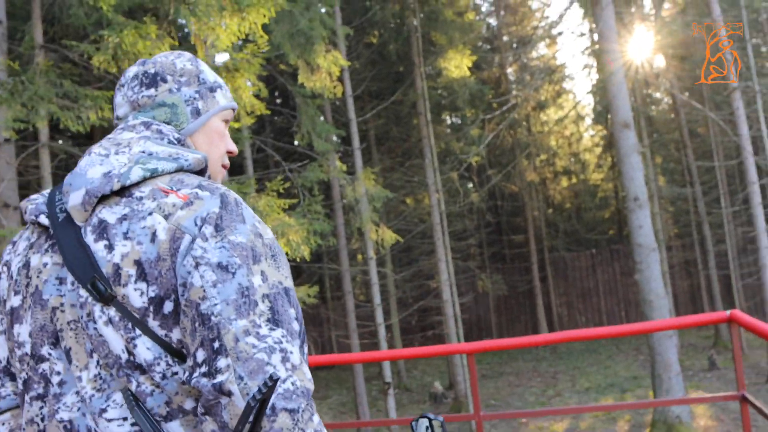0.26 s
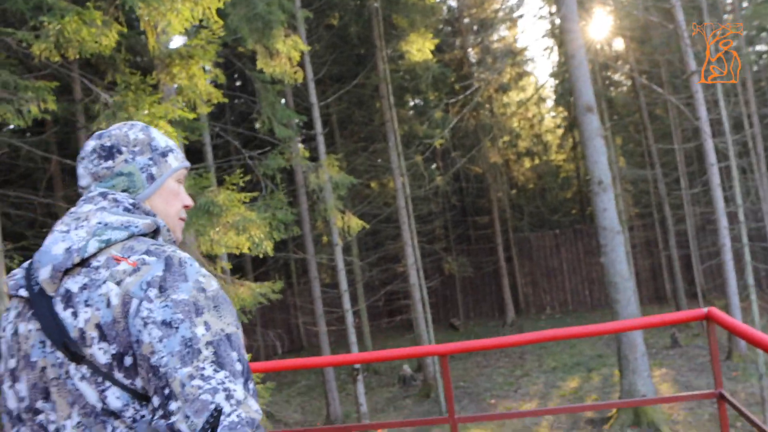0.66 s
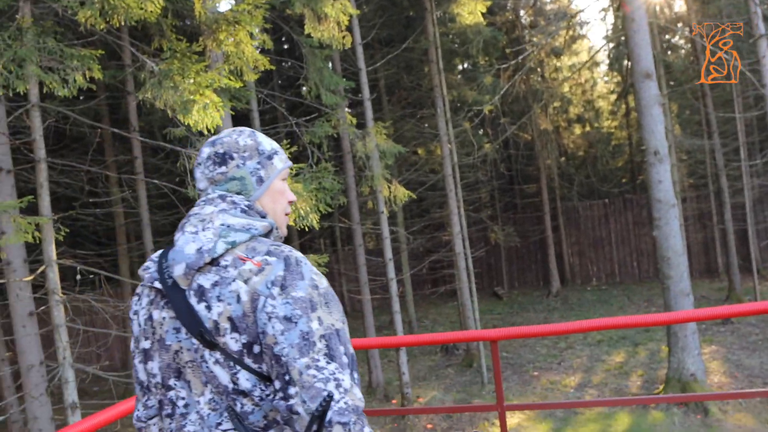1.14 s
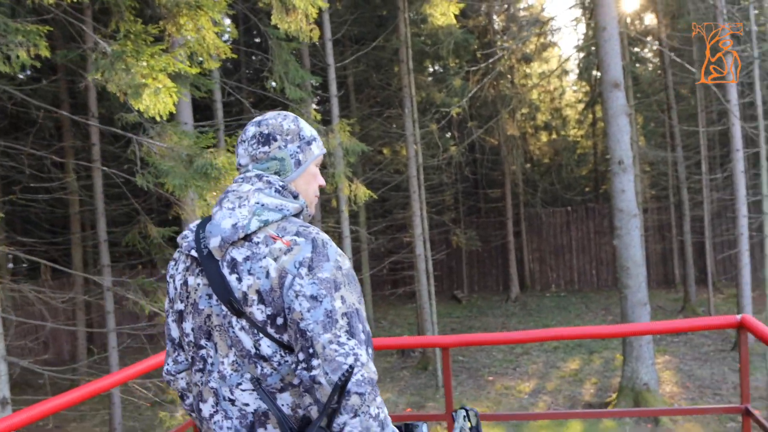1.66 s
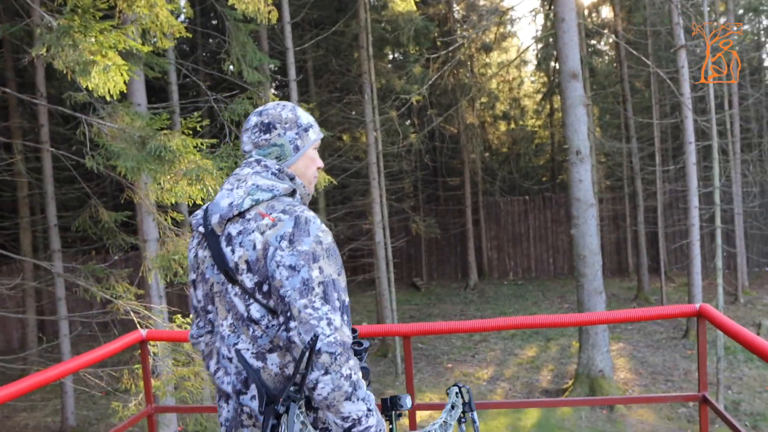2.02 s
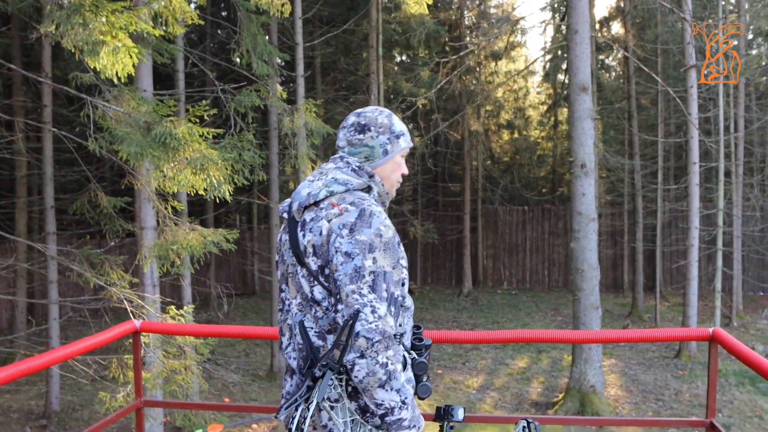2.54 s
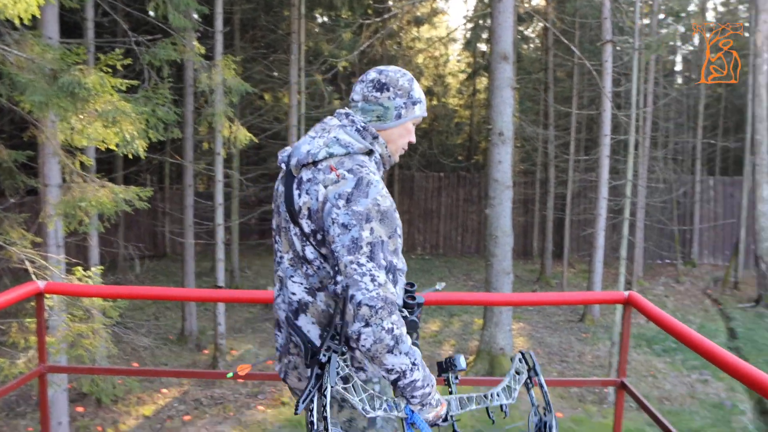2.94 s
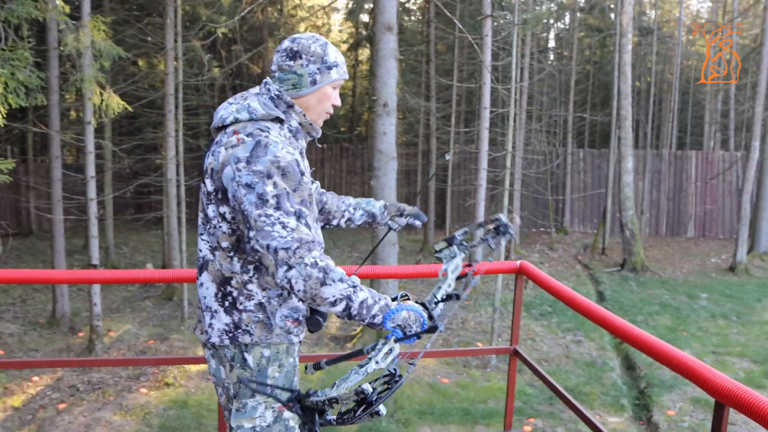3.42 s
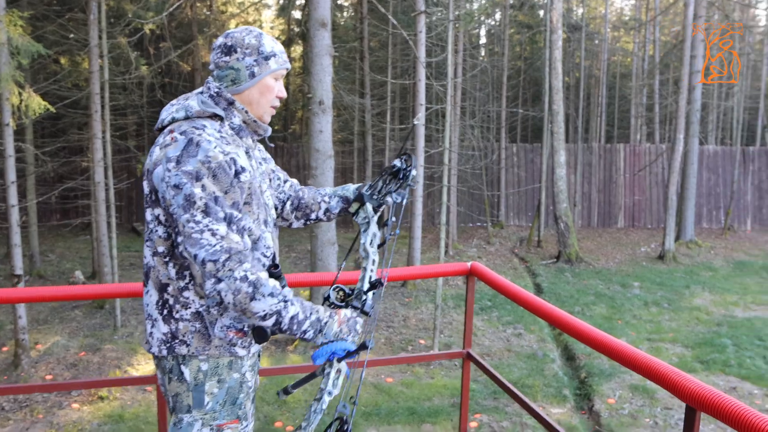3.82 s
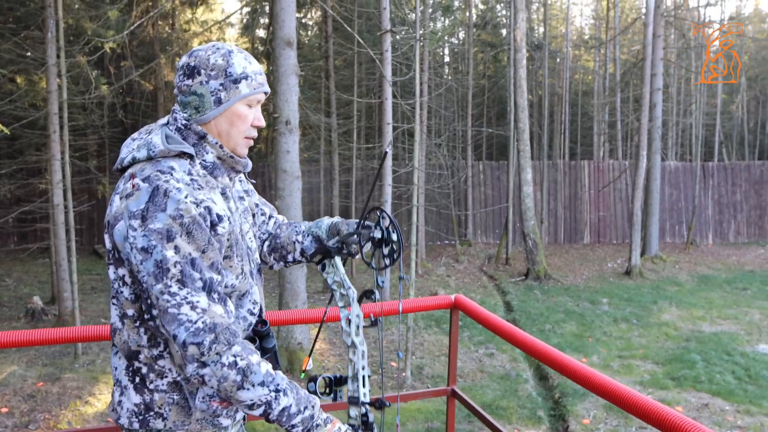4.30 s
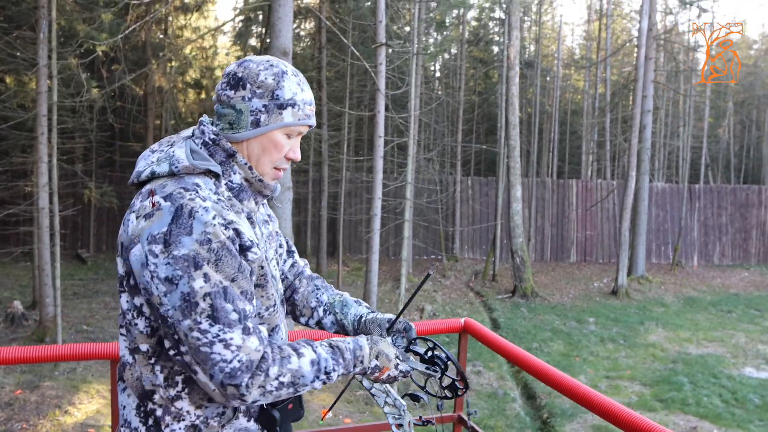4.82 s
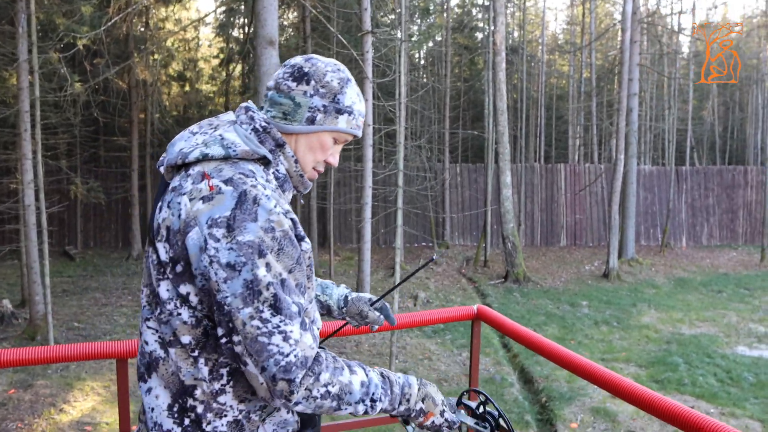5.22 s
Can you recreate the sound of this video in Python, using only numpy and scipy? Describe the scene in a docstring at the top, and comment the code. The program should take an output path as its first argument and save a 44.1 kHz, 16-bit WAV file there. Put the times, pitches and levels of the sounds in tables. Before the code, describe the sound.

A raised hollow wooden deck in a forest, heard close on a stereo microphone that is narrow in the bass and wide in the treble. From the start a distant roar is already rolling off, losing treble as it fades; weaker, duller waves return near 1.7 and 3.3 s. A low outdoor rumble with faint hiss continues throughout. At 0.4 to 0.6 s boots thud and boards knock hard, with a jacket rub. Gear ticks from 1.1 s, boards knock again at 1.4 and 1.7 to 1.9 s, then a dense burst of bright, hard cracks comes at 2.15 to 2.2 s and another knock at 2.7 s. Small clicks and cloth lead to a sharp, ringing bow-fitting snap at 3.6 s. Around 4.2 s knocks and booming steps return, followed by light gust buffeting. A faint low drone wavers from 4.75 s, and a softer snap ends it at 5.4 s.

```python
"""A raised wooden platform in a forest, caught close by on a microphone pair: a distant roar is already
rolling off between the trees over a low outdoor rumble; it comes back in weaker waves, each losing treble
as it dies. From 0.4 s boots thud on the hollow deck, boards knock, a jacket rustles and gear ticks.
A bow fitting snaps at 3.6 s and again, more softly, at 5.4 s; a light gust buffets the microphone at 4.3 s
and a faint drone wavers from 4.75 s. Struck parts are ringing modes; roar, air, cloth and gust are noise."""
import sys
import numpy as np
from scipy import signal
from scipy.fft import rfft, irfft
from scipy.io import wavfile
from scipy.ndimage import uniform_filter1d, minimum_filter1d

SR = 44100
rng = np.random.default_rng(int(sys.argv[2]) if len(sys.argv) > 2 else 0)


def unload_audio(sound):
    """Save the sound as a 16-bit wav file, at the path given as the first command line argument."""
    columns = np.transpose(np.atleast_2d(sound))
    # keep every value between -1 and 1, then stretch to whole-number steps
    steps = np.round(np.clip(columns, -1, 1) * 32767)
    wavfile.write(sys.argv[1], SR, steps.astype(np.int16))


N = 240653
HIT_SIZE = SR // 7      # samples in one hit
MODE_SPREAD_DB = 1.5    # how much a mode's share varies from blow to blow

# modes of hard wood, also used for small gear: f/Hz, level/dB before the sqrt(t60) weight, t60/s
CLACK_MODES = [(674, -0.5, 0.042), (770, 4.5, 0.037), (923, 13.5, 0.029), (980, 2, 0.021),
               (1180, 2.5, 0.023), (1300, -1, 0.032), (1480, 2, 0.019), (1644, 6.5, 0.024), (1760, 3, .025),
               (1930, -14.5, 0.019), (2500, 2, 0.011), (2700, -2, .02), (3380, -8, 0.044),
               (3990, -16.5, .035)]
# spectrum of the bright crack of a contact: f/Hz, level/dB
CRACK_COLOUR = [(500, -20), (1500, -28), (2900, 12), (4200, 6), (6000, -2.5), (8000, -13.5), (11000, -24),
                (14000, -32.5), (16000, -31)]


def from_db(db):
    """Decibels to gain."""
    return 10 ** (np.asarray(db) / 20)


def in_time(rows):
    """A level curve, straight in dB between its points, as a gain for every sample."""
    return from_db(np.interp(np.arange(N) / SR, *np.transpose(rows)))


def at_hz(points, hz):
    """Read a spectrum on a log-frequency axis."""
    freqs, values = np.transpose(points)
    return np.interp(np.log(np.maximum(hz, 1)), np.log(freqs), values)


def colour(x, points):
    """Causal (minimum-phase) filter with the given spectrum, made by folding its cepstrum."""
    size = 4096
    gains = from_db(at_hz(points, np.arange(size // 2 + 1) * SR / size))
    cepstrum = irfft(np.log(gains))
    cepstrum[1:size // 2] *= 2
    cepstrum[size // 2 + 1:] = 0
    response = irfft(np.exp(rfft(cepstrum)))
    response = response.reshape((1,) * (x.ndim - 1) + (-1,))
    return signal.fftconvolve(x, response)[..., :x.shape[-1]]


def band(x, low_hz, high_hz):
    """Gentle band-pass."""
    edges_hz = [low_hz, min(high_hz, SR / 2 - 1000)]
    return signal.sosfilt(signal.butter(2, edges_hz, "band", fs=SR, output="sos"), x)


def drift(rate):
    """Slow chance with a spread near 1, from straight lines between `rate` random points per second."""
    steps = np.arange(N) / SR * rate
    return np.interp(steps, np.arange(N // 10), rng.standard_normal(N // 10))


def noise(points):
    """Mid and side noise of one colour, rms 1."""
    x = colour(rng.standard_normal((2, N)), points)
    return x / x.std()


def swell(start_s, rise_s, hold_s, fall_db_per_s):
    """Envelope of height 1: a straight rise, a hold, an exponential fall."""
    t = np.arange(N) / SR - start_s
    rise = np.clip(t / max(rise_s, 1e-3), 0, 1)
    return rise * from_db(-fall_db_per_s * np.maximum(t - rise_s - hold_s, 0))


def dying(t60):
    """Exponential decay over the length of one hit."""
    return from_db(-60 * np.arange(HIT_SIZE) / SR / max(t60, 1e-3))


def rising(rise_s):
    """Straight attack at the start of one hit."""
    return np.minimum(np.arange(HIT_SIZE) / SR / rise_s, 1)


def at_level(hit, db):
    """Scale each channel of a hit so that its energy equals 10 ms at this rms level."""
    rms_over_10_ms = np.sqrt(np.sum(hit ** 2, axis=-1, keepdims=True) / (SR / 100))
    return hit * from_db(db) / rms_over_10_ms


def add(track, s, hit):
    """Mix a hit into a track at a time."""
    start = round(s * SR)
    track[:, start:start + HIT_SIZE] += hit[:, :N - start]


def contact(chatter_s, chatter_db, uneven_db=5.0, bumps_per_s=700):
    """Force of a blow, mid and side: one impact, then a dying, uneven chatter of tiny ones."""
    steps = np.arange(HIT_SIZE) / SR * bumps_per_s
    bumps = np.interp(steps, np.arange(HIT_SIZE), rng.standard_normal(HIT_SIZE))
    chatter = rng.standard_normal((2, HIT_SIZE)) * dying(chatter_s) * from_db(uneven_db * bumps)
    force = from_db(chatter_db) * chatter / np.linalg.norm(chatter, axis=1, keepdims=True)
    force[:, 0] += [1, rng.choice([-1, 1])]  # the impact falls on either side
    return force


def ring(force, modes, vary_db, tilt_db=0):
    """A body's modes start together, each taking a slightly different share of every blow."""
    out = 0
    for hz, db, t60 in modes:
        r = np.exp(-np.log(1000) / (abs(t60) * SR))
        mode = signal.lfilter([1, 0, -1], [1, -2 * r * np.cos(2 * np.pi * hz / SR), r * r], force)
        tilted_db = db + tilt_db * np.log2(hz / modes[0][0])
        share_db = tilted_db + vary_db * rng.standard_normal((2, 1))
        out = out + np.sqrt(abs(t60)) * at_level(mode, share_db)
    # above its highest mode the body radiates little
    top_hz = min(1.3 * modes[-1][0], 16000)
    return signal.sosfilt(signal.butter(4, top_hz, fs=SR, output="sos"), out)


def retuned(modes, ratio):
    """The same modes on a shorter or longer piece."""
    return [(hz * ratio, db, t60) for hz, db, t60 in modes]


def crowded_modes(t60, centre_hz):
    """Dying noise stands for many weak, crowded modes that fill the gaps between the strong ones."""
    crowd = rng.standard_normal((2, HIT_SIZE)) * dying(t60)
    return band(band(crowd, centre_hz / 3.3, centre_hz * 1.1), 530, 4300)


def far_roar(dulling_db_per_s=23.5, roll_db=2.5):
    """Each wave swells and dies; its later sound came farther through the trees and lost more treble."""
    # waves: start t/s, rise/s, hold/s, level/dB, fall/(dB per s)
    waves = [(-.02, 0.021, 0.023, -16.5, 10), (0.029, 0.028, 0.06, -17.5, 394.5),
             (1.697, 0.15, 0.24, -34, 27), (3.283, 0.091, 0.52, -36.5, 5.5)]
    # spectrum of the roar: f/Hz, level/dB
    roar_colour = [(100, -37.5), (200, -10), (330, -1.5), (480, 1.5), (630, 1), (780, -1.5), (950, -3),
                   (1400, -7.5), (2300, -16.5), (3200, -29), (5000, -44), (7000, -68), (10000, -78),
                   (16000, -90)]
    power = treble_power = 0
    for s, rise_s, hold_s, db, fall_db_per_s in waves:
        wave = from_db(db) * swell(s, rise_s, hold_s, fall_db_per_s)
        treble_wave = from_db(db) * swell(s, rise_s, hold_s, fall_db_per_s + dulling_db_per_s)
        power = power + wave ** 2
        treble_power = treble_power + treble_wave ** 2
    roar = noise(roar_colour)
    low = signal.sosfiltfilt(signal.butter(1, 1300, fs=SR, output="sos"), roar)
    rolling = from_db(roll_db * drift(45))
    return rolling * (np.sqrt(power) * low + np.sqrt(treble_power) * (roar - low))


def air(level_db=2.0):
    """Low outdoor rumble with a faint hiss on top: coloured noise under a slow level curve."""
    # level curve: t/s, level/dB before level_db is added
    rumble_curve = [(0, -34), (1.1, -38.5), (1.7, -30), (2.5, -35.5), (3.0, -33.5), (3.9, -34), (5.46, -35)]
    # spectrum of the open air: f/Hz, level/dB
    air_colour = [(15, -3.5), (30, -7.5), (48, -0.5), (90, -1), (180, -3), (300, -8.5), (550, -13),
                  (950, -21), (1500, -33.5), (3000, -45.5), (6000, -55.5), (10000, -64.5), (16000, -89.5)]
    return from_db(level_db) * in_time(rumble_curve) * noise(air_colour)


def boom(hz, db):
    """The hollow deck booms for a few cycles."""
    deck = [(hz * 0.7, -5, .14), (hz, 0, .09), (hz * 1.346, -4, .07), (hz * 3.5, -10, .05)]
    force = contact(0.078, chatter_db=2.0, uneven_db=3.0)
    return at_level(band(ring(force, deck, vary_db=MODE_SPREAD_DB), 57, 300), db)


def footfalls():
    """The deck booms under the weight; a heel adds a dull wooden knock."""
    # weight coming down on the deck: t/s, level/dB, boom f/Hz
    thuds = [(0.406, -19, 94), (.551, -12, 176), (0.601, -25, 126), (1.764, -25, 105), (1.901, -21.5, 110),
             (4.209, -24, 264), (4.212, -15.5, 89), (4.359, -15.5, 117), (4.377, -20.5, 80.6),
             (4.433, -21.5, 142), (4.752, -26, 97), (4.843, -26, 75)]
    # heels landing on a plank: t/s, level/dB
    heels = [(0.407, -23), (.552, -12)]
    # modes of plank under heel: f/Hz, level/dB before the sqrt(t60) weight, t60/s
    heel_modes = [(368, -6.5, 0.012), (487, 1, 0.023), (580, 3.5, 0.021), (804, -7, 0.017),
                  (1063, 1.5, 0.022)]
    out = np.zeros((2, N))
    for s, db, hz in thuds:
        add(out, s, boom(hz, db))
    for s, db in heels:
        force = contact(.012, chatter_db=3.0)
        knock = ring(force, heel_modes, vary_db=MODE_SPREAD_DB)
        add(out, s, at_level(band(knock, 120, 2100), db))
    return out


def first_contact(hardness, pulse_hz=1400, octaves_per_tilt=0.11, t60=0.0018):
    """The board gives way in one short push and rebound; a harder blow makes it shorter."""
    hz = pulse_hz * 2 ** (octaves_per_tilt * hardness)
    pulse = np.sin(2 * np.pi * hz * np.arange(HIT_SIZE) / SR) * dying(t60)
    return band(pulse, 440, 3600) * np.array([[1], [0]])  # mid only


def frame_rumble(db, low_hz=130, high_hz=520, t60=0.24, rise_s=0.0081):
    """A blow spreads through the loose boards of the frame and dies as a rough rumble without pitch."""
    rough = rng.standard_normal((2, HIT_SIZE)) * rising(rise_s) * dying(t60)
    return at_level(band(rough, low_hz, high_hz), db)


def knocks(dense_db=-3.0, sparse_db=-5.0, ring_s=0.014):
    """A sharp push, a bright crack and a hard clack, then the slower answer of plank, deck and frame."""
    # boards knocking underfoot: t/s, push gain/dB, crack level/dB, clack level/dB before sparse_db or
    # dense_db, plank level/dB, deck boom level/dB, frame rumble level/dB, contact chatter t60/s,
    # hardness as clack tilt/(dB per octave), clack pitch ratio, plank pitch ratio
    boards = [ (.408, -6, -62, -22, -27.5, -49, -38, 0.054, -3, 0.56, 2.7),
              (0.5471, -1.5, -25, -17, -18.5, -23.5, -20, 0.029, -1, 1, 1.42),
              (1.428, -14, -39, -18, -17.5, -26, -22.5, 0.041, -1.5, 1.06, 1),
              (1.7195, -19, -35, -25.5, -19.5, -28, -25, 0.035, -0.5, 1.1, 1.13),
              (1.859, -19, -41, -24.5, -29, -27, -32.5, .025, -3, 0.93, 1.1),
              (2.1464, 1, -21, -14.5, -33, -27, -30, .012, 2, 1.15, 1),
              (2.1517, 10, -20.5, -11.5, -18, -34, -20.5, 0.024, 3, 1.08, 1.05),
              (2.222, 11, -19, -12.5, -25.5, -32, -26, 0.016, 1.5, 1.04, 1.04),
              (2.713, -2.5, -24.5, -18, -26.5, -27, -23, 0.06, -1, 1.02, 2.08),
              (4.1829, -16, -26.5, -17.5, -22, -30, -25, 0.095, 0, 1.06, 1),
              (4.194, -10, -33, -14.5, -19.5, -25, -33, 0.044, -4, 1.1, 2.29),
              (4.207, -18, -45, -23, -33, -36, -21.5, .025, -16, 1.17, .98)]
    # plank modes: f/Hz, level/dB before the sqrt(t60) weight, t60/s
    plank_modes = [(258, -8.5, 0.072), (357, -3.5, 0.031), (422, -14.5, 0.054), (497, -16, 0.01),
                   (676, -4.5, 0.029)]
    plank_lag_s, boom_lag_s, deck_hz = 0.0017, 0.0059, 124
    out = np.zeros((2, N))
    for (s, push_db, crack_db, clack_db, plank_db, boom_db, rumble_db,
         chatter_s, tilt, clack_ratio, plank_ratio) in boards:
        force = contact(chatter_s, chatter_db=7.5)
        clack = ring(force, retuned(CLACK_MODES, clack_ratio), vary_db=MODE_SPREAD_DB, tilt_db=tilt)
        plank = ring(force, retuned(plank_modes, plank_ratio), vary_db=MODE_SPREAD_DB)
        # a harder blow excites higher modes
        centre_hz = np.clip(1650 * np.exp(0.21 * tilt), 700, 3000)
        crowd = crowded_modes(chatter_s + ring_s, centre_hz)
        add(out, s, first_contact(tilt) * from_db(push_db))
        add(out, s, at_level(colour(force, CRACK_COLOUR), crack_db))
        add(out, s, at_level(clack, clack_db + sparse_db))
        add(out, s, at_level(crowd, clack_db + dense_db))
        add(out, s + plank_lag_s, at_level(band(plank, 140, 1000), plank_db))
        add(out, s + boom_lag_s, boom(deck_hz, boom_db) + frame_rumble(rumble_db))
    return out


def forest(x, near_db=-5.0, near_t60=0.015, absorbed_db_per_khz=4.5):
    """Quick, dull reflections from deck and railing, then a thin scatter from the trunks."""
    # scatter from the trunks in octave bands: f/Hz, level/dB, t60/s
    trunks = [(240, -8, 0.48), (422, -8, 0.21), (830, -12, 0.22), (1590, -18.5, 0.35), (3900, -16.5, 0.56),
              (6400, -25.5, 0.29), (12000, -35, .3)]
    t = np.arange(SR) / SR
    response = 0
    for hz, db, t60 in trunks:
        far = from_db(-60 * t / t60) * (1 - np.exp(-t / .015))
        near = from_db(-60 * t / near_t60) * (t > .004)
        reflected_db = near_db - absorbed_db_per_khz * hz / 1000
        far_shape = from_db(db) * far / np.linalg.norm(far)
        near_shape = from_db(reflected_db) * near / np.linalg.norm(near)
        scatter = band(rng.standard_normal((2, SR)), hz / np.sqrt(2), hz * np.sqrt(2))
        response = response + scatter * (far_shape + near_shape)
    # the mid alone feeds echoes in both mid and side
    return signal.fftconvolve(x[:1], response, axes=1)[:, :N]


def crinkles(per_s=900, size_db=2.0):
    """Creases pop at random in a few pitch bands, small ones more often than large ones; rms 1."""
    # pitches of popping creases: f/Hz
    crease_hz = [1500, 2000, 2600, 3300, 4200]
    out = 0
    for hz in crease_hz:
        pops = rng.random(N) < per_s / len(crease_hz) / SR
        sizes = from_db(size_db * np.minimum(rng.exponential(1, N), 3))
        clicks = pops * sizes * rng.standard_normal((2, N))
        out = out + band(clicks, hz / np.sqrt(2), hz * np.sqrt(2)) / hz
    return out / out.std()


def jacket(grain_db=1.5, catch_db=0.5, crinkle_db=-6.0):
    """Cloth slides in tiny catches, so its hiss is grainy, most of all in the treble."""
    # strokes of jacket and soles rubbing, and the hissing tails of the knocks at 2.24 and 4.19 s:
    # start t/s, rise/s, hold/s, level/dB, scratchiness as treble/dB above the stroke level, fall/(dB per s)
    rubs = [(0.465, 0.025, 0.067, -30.5, -9, 87), (1.23, 0.063, .015, -43, 9.5, 114),
            (1.36, .033, 0.053, -48, 12.5, 98), (1.72, 0.013, 0.3, -36.5, -8.5, 86),
            (2.238, 0.026, 0.11, -42.5, 3.5, 70), (2.679, .004, 0.014, -40, 5.5, 52),
            (3.262, 0.0036, 0.027, -42, 11, 112), (3.376, .01, 0.051, -41.5, 4, 86),
            (3.45, 0.077, 0.16, -43, 6.5, 86), (3.706, 0.035, .045, -41.5, 5, 327),
            (4.193, 0.025, .045, -44, 7.5, 86), (4.302, 0.036, 0.06, -44, -2.5, 31),
            (4.745, .01, 0.053, -47.5, 3.5, 220), (5.01, .019, 0.095, -50, 1, 81)]
    # spectrum of the cloth: f/Hz, level/dB
    cloth_colour = [(200, 2.5), (600, 3), (1200, 8), (2300, -0.5), (3500, -10.5), (5000, -19.5),
                    (7000, -36.5), (10000, -53.5), (16000, -53.5)]
    stir_db, stir_scratch_db = -58.5, 7  # between strokes the cloth still stirs faintly
    power = from_db(stir_db) ** 2
    treble_power = from_db(stir_db + stir_scratch_db) ** 2
    for s, rise_s, hold_s, db, scratch_db, fall_db_per_s in rubs:
        stroke = from_db(db) * swell(s, rise_s, hold_s, fall_db_per_s)
        power = power + stroke ** 2
        treble_power = treble_power + (stroke * from_db(scratch_db)) ** 2
    cloth = noise(cloth_colour)
    body = signal.sosfiltfilt(signal.butter(2, 3200, fs=SR, output="sos"), cloth)
    catches = from_db(catch_db * drift(500))
    treble = (cloth - body) * catches / np.sqrt(np.mean(catches ** 2))
    treble = treble + from_db(crinkle_db) * treble.std() * crinkles()
    grain = from_db(grain_db * drift(120))
    return grain * (np.sqrt(power) * body + np.sqrt(treble_power) * treble)


def gear_ticks(crack_db=-11.0, clack_db=-6.0, dense_db=-9.5, centre_hz=2000, ring_s=0.025,
               pitch_spread=0.23):
    """Small parts touch, each at its own pitch: a scratchy crack and a little clack, no deck boom."""
    # buckles and gear: t/s, level/dB before the part offsets, contact chatter t60/s,
    # brightness/dB (raises the crack in full, lowers the clack by half)
    ticks = [(0.577, -32, 0.0092, -1), (0.631, -35.5, 0.065, 3.5), (1.08, -27.5, 0.092, -1.5),
             (1.183, -36.5, 0.093, -0.5), (1.313, -28.5, 0.028, 1), (1.343, -29.5, 0.031, 0.5),
             (1.382, -31.5, 0.032, 2.5), (1.742, -35, 0.031, -9), (1.8563, -26, 0.038, 2.5),
             (1.992, -38, 0.022, -13), (2.008, -31.5, 0.019, 7.5), (2.016, -23, 0.019, 3),
             (2.023, -33, 0.015, 2), (2.1863, -31, 0.037, 14), (2.1915, -23, 0.024, -0.5),
             (2.201, -37, 0.0099, 9), (2.207, -24, 0.0093, 3), (2.464, -30, 0.075, 1),
             (2.747, -46, 0.014, -6), (3.266, -33.5, 0.083, 1.5), (3.34, -27.5, 0.015, -2),
             (3.359, -26.5, 0.017, -1.5), (3.384, -43, .025, 5), (3.4182, -40, .012, 2),
             (3.442, -45, .02, -8), (3.494, -46, .02, -1), (3.520, -34.5, 0.011, 5.5),
             (3.546, -33, 0.024, 5), (3.555, -28.5, .04, 0), (4.0911, -25, 0.078, 0.5),
             (4.482, -45, 0.0092, 1), (4.525, -45, 0.021, 1.5), (4.75, -38.5, 0.11, -0.5),
             (4.917, -52, .012, 6)]
    out = np.zeros((2, N))
    for s, db, chatter_s, bright_db in ticks:
        force = contact(chatter_s, chatter_db=15.0)
        modes = retuned(CLACK_MODES, np.exp(pitch_spread * rng.uniform(-1, 1)))
        clack = ring(force, modes, vary_db=MODE_SPREAD_DB)
        crowd = crowded_modes(chatter_s + ring_s, centre_hz)
        add(out, s, at_level(colour(force, CRACK_COLOUR), db + crack_db + bright_db))
        add(out, s, at_level(clack, db + clack_db - bright_db / 2))
        add(out, s, at_level(crowd, db + dense_db - bright_db / 2))
    return out


def bow_snap(side_db=-4.5, rattle_hz=2500, rattle_s=0.068, crack_db=-16.0, build_s=0.001):
    """A stiff fitting snaps home, rings and rattles briefly and jolts the body that holds it."""
    # snaps, levels before side_db narrows the side: t/s, ring level/dB, hollow body level/dB,
    # rattle level/dB, contact chatter t60/s, pitch ratio
    snaps = [(3.5887, -10, -16.5, -24, 0.0089, 1), (5.4133, -29, -25.5, -26, 0.036, 1.12)]
    # the bow jolts in the hand after a snap: t/s, level/dB before side_db narrows the side
    jolts = [(3.599, -21.5), (3.616, -24.5), (5.432, -25.5)]
    # modes of the fitting: f/Hz, level/dB before the sqrt(t60) weight, t60/s
    fitting_modes = [(800, -18, 0.023), (1550, -3.5, 0.036), (1840, 6.5, 0.018), (2390, 3, 0.014),
                     (2562, 13, 0.012), (2825, 0, 0.02), (4350, -1, 0.016), (5200, -14, .012),
                     (7020, -18, .006)]
    # modes of the hollow body: f/Hz, level/dB before the sqrt(t60) weight, t60/s
    body_modes = [(247, -1, 0.033), (397, 12.5, 0.042), (522, 9, 0.035), (690, -2.5, 0.042),
                  (860, -8, 0.017)]
    out = np.zeros((2, N))
    for s, ring_db, body_db, rattle_db, chatter_s, ratio in snaps:
        force = contact(chatter_s, chatter_db=-12.0)
        jolt = contact(0.03, chatter_db=-1.0)
        fitting = ring(force, retuned(fitting_modes, ratio), vary_db=MODE_SPREAD_DB)
        body = ring(jolt, retuned(body_modes, ratio), vary_db=MODE_SPREAD_DB)
        crack = band(force * rising(build_s), 1300, 6300)
        add(out, s, at_level(fitting * rising(build_s), ring_db))
        add(out, s, at_level(crack, ring_db + crack_db))
        add(out, s, at_level(crowded_modes(rattle_s, rattle_hz), rattle_db))
        add(out, s + 0.00112, at_level(body, body_db))
    for s, db in jolts:
        jolt = contact(0.03, chatter_db=-1.0)
        add(out, s, at_level(ring(jolt, body_modes, vary_db=MODE_SPREAD_DB), db))
    return out * from_db([[0], [side_db]])


def breeze(side_db=-10.0):
    """One light gust: lumpy low buffeting, partly different in the left and right microphone port."""
    start_s, rise_s, hold_s, fall_db_per_s, gust_db = 4.26, 0.22, 0.39, 25, -30.5
    mid, side = noise([(20, -35), (50, 5.0), (90, -5.5), (170, -4.5), (300, -19.0), (600, -34.0),
                       (2000, -61), (8000, -85.5)])
    buffet = np.array([mid + from_db(side_db) * side, mid - from_db(side_db) * side])
    lumps = from_db(2 * drift(19))
    return from_db(gust_db) * swell(start_s, rise_s, hold_s, fall_db_per_s) * lumps * buffet


def drone(pitch_hz=192.5, waver=0.0202):
    """A faint far tone rises out of the rumble: a sine that wavers in pitch and level."""
    # swells of the drone: start t/s, level/dB
    swells = [(4.75, -32.5), (5.25, -31)]
    rise_s, fall_db_per_s = 0.18, 65
    level = sum(from_db(db) * swell(s, rise_s, 0, fall_db_per_s) for s, db in swells)
    phase = 2 * np.pi * np.cumsum(pitch_hz * (1 + waver * drift(23))) / SR
    return level * from_db(1.8 * drift(10)) * np.sin(phase)


def scene(snap_echo_db=-10.5):
    """All sources as mid and side, turned into left and right; gust and drone join after that."""
    # the microphone pair is narrow in the bass and very wide in the treble: f/Hz, side gain/dB
    width = [(40, -35), (130, -26), (300, -16.5), (650, -11), (1100, -6), (2000, -2), (3200, 1.5),
             (5000, 5), (8000, 10), (15000, 8)]
    deck = knocks() + gear_ticks() + footfalls()
    snap = bow_snap()
    echoes = forest(deck + from_db(snap_echo_db) * snap)
    mid, side = deck + snap + echoes + jacket() + far_roar() + air()
    side = colour(side, width)
    return np.array([mid + side, mid - side]) + breeze() + drone()


def record(dry, ceiling=1.2, cutoff_hz=16000):
    """A fast limiter tames the loudest peaks, the rest is flattened at full scale, and the top is cut."""
    gain = 1 / np.maximum(np.abs(dry).max(axis=0) / ceiling, 1)
    limited = dry * uniform_filter1d(minimum_filter1d(gain, size=25), size=25)
    clipped = limited / (1 + limited ** 8) ** (1 / 8)
    return signal.sosfilt(signal.ellip(10, .1, 80, cutoff_hz, fs=SR, output="sos"), clipped)


dry = scene()
out = record(dry)
unload_audio(out)
```